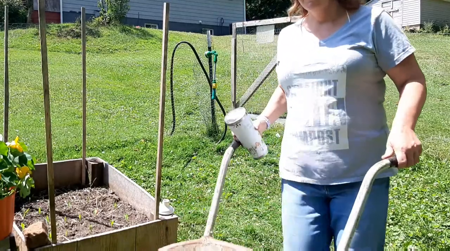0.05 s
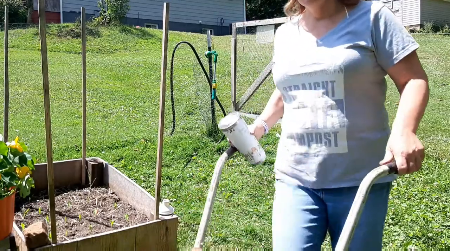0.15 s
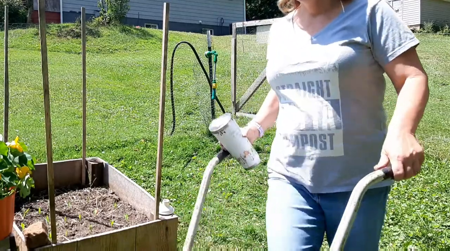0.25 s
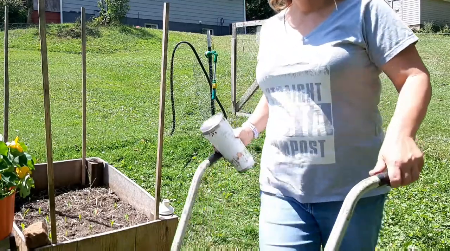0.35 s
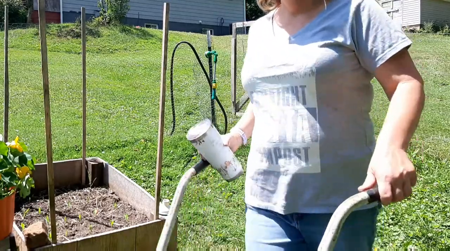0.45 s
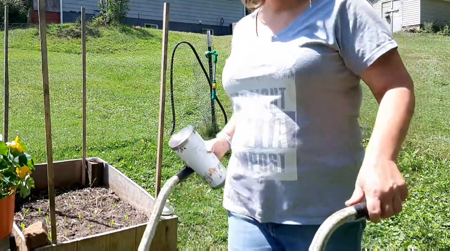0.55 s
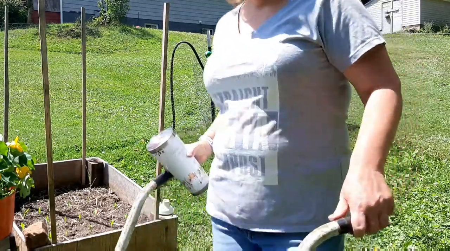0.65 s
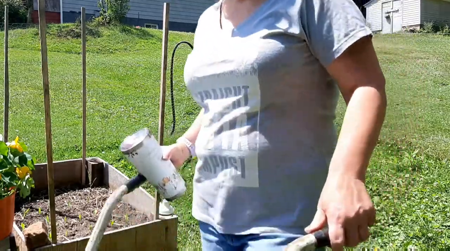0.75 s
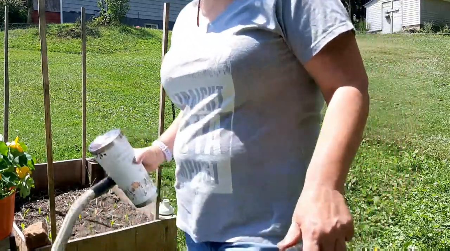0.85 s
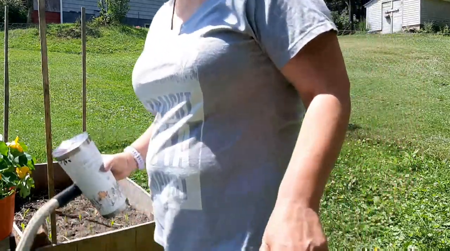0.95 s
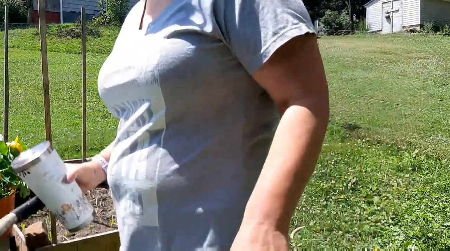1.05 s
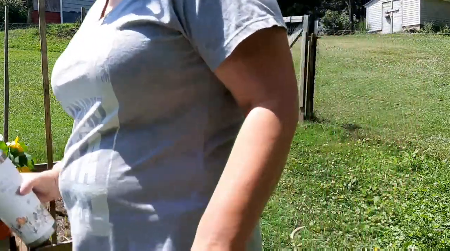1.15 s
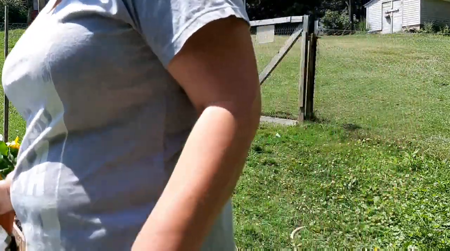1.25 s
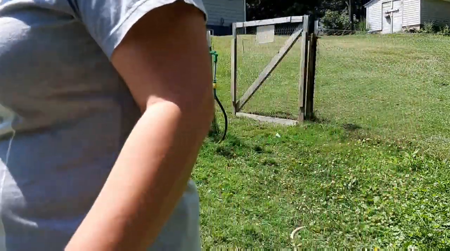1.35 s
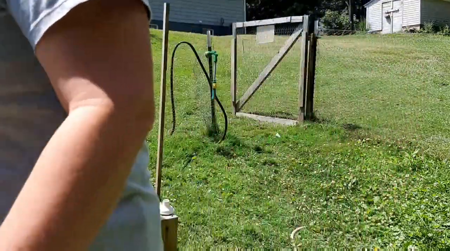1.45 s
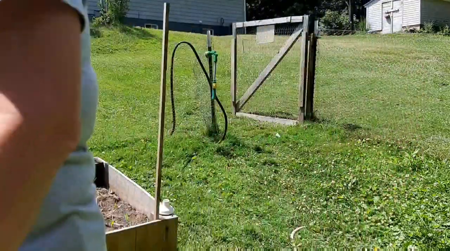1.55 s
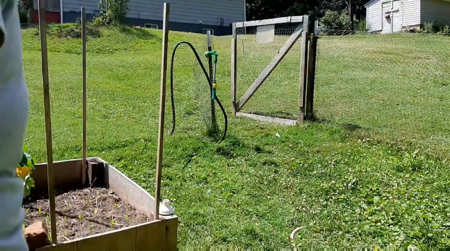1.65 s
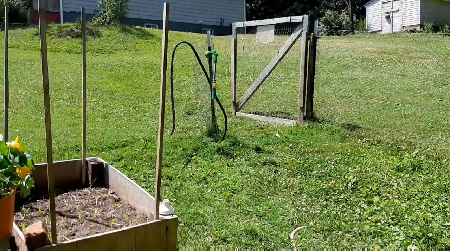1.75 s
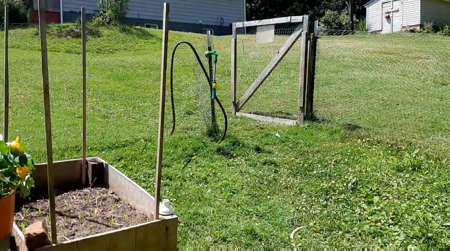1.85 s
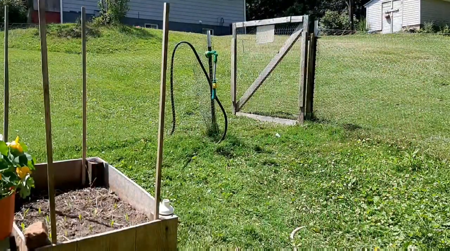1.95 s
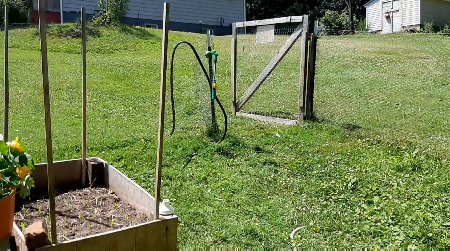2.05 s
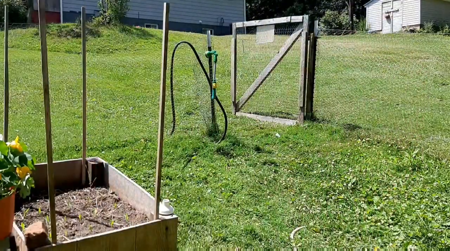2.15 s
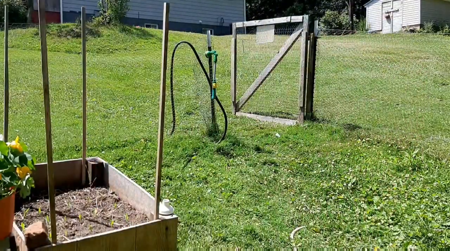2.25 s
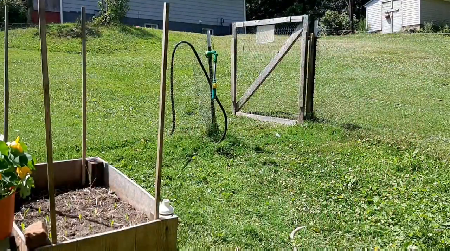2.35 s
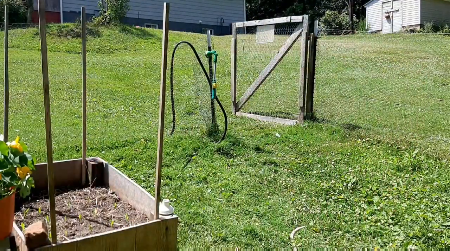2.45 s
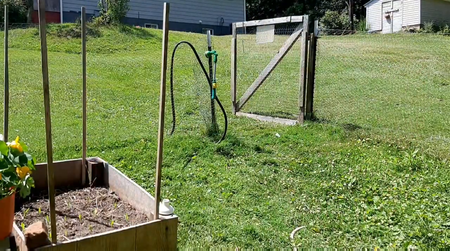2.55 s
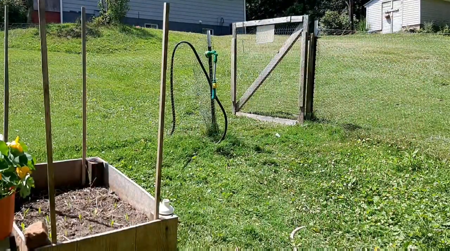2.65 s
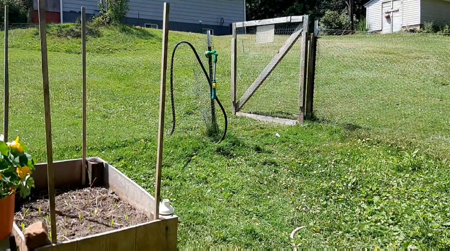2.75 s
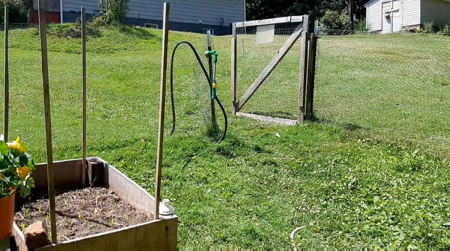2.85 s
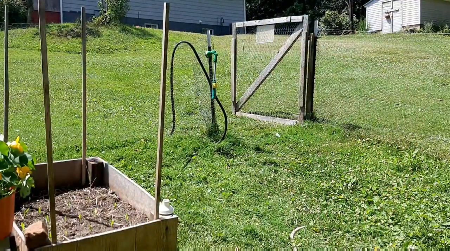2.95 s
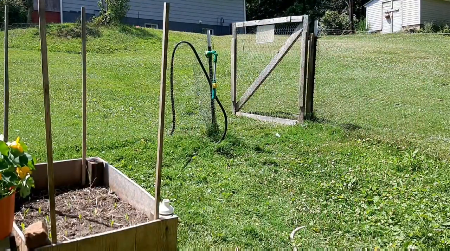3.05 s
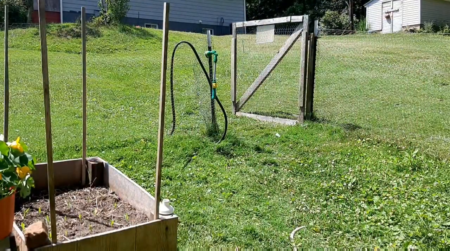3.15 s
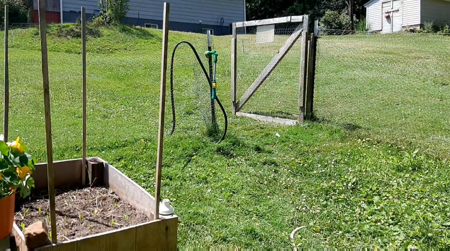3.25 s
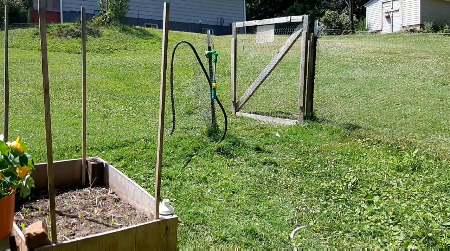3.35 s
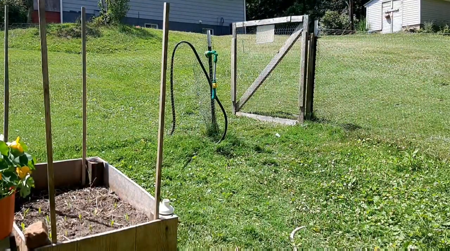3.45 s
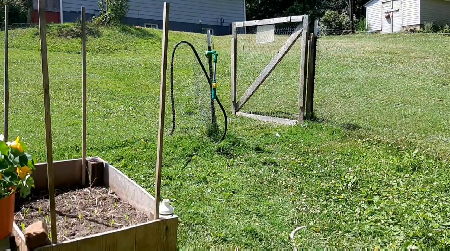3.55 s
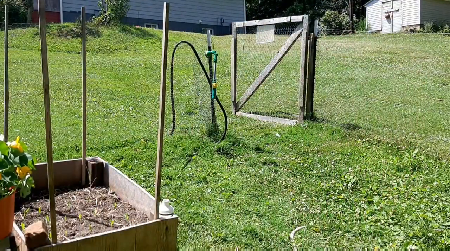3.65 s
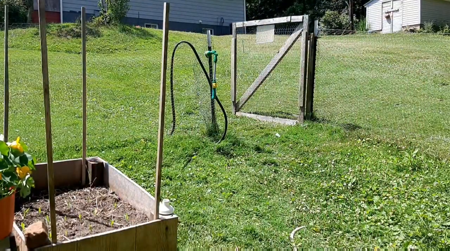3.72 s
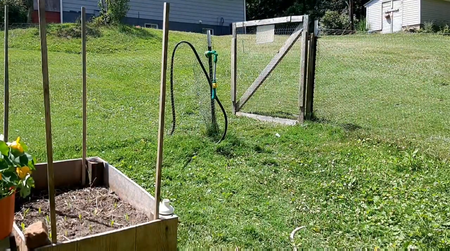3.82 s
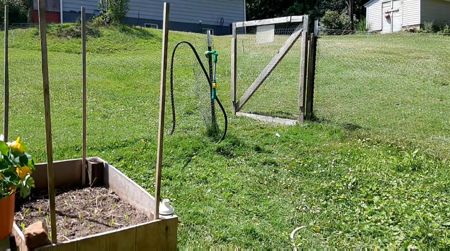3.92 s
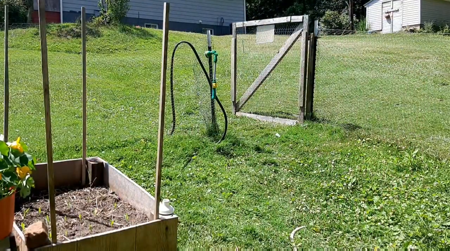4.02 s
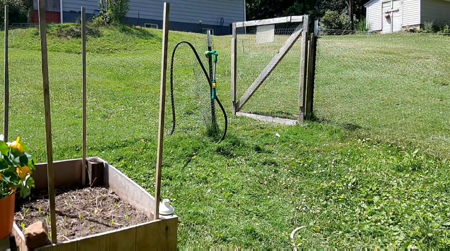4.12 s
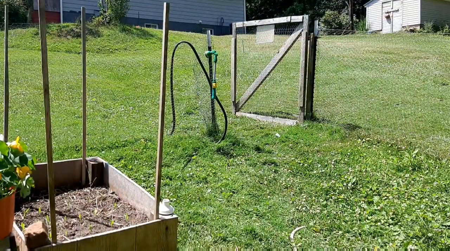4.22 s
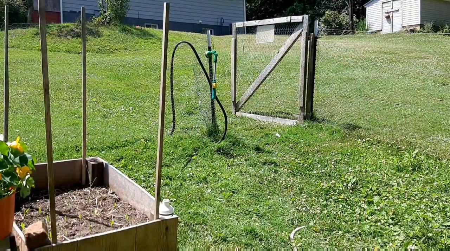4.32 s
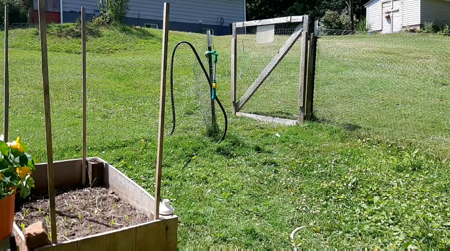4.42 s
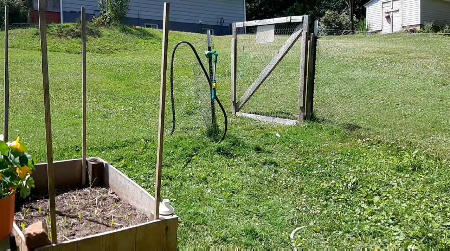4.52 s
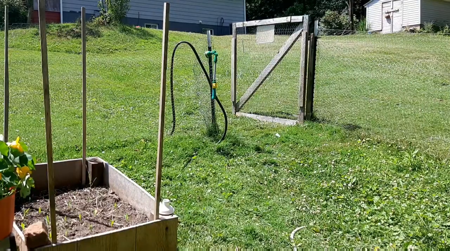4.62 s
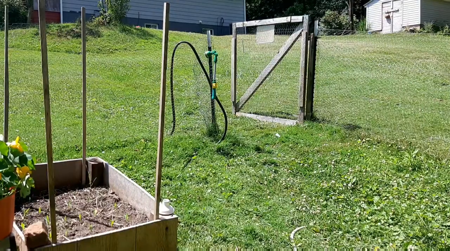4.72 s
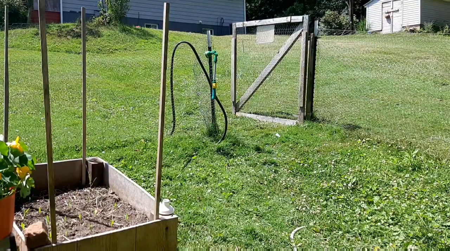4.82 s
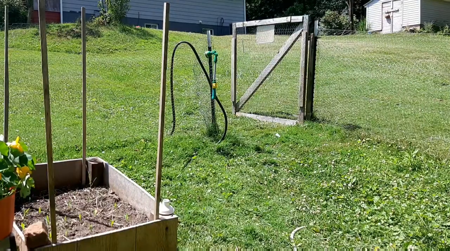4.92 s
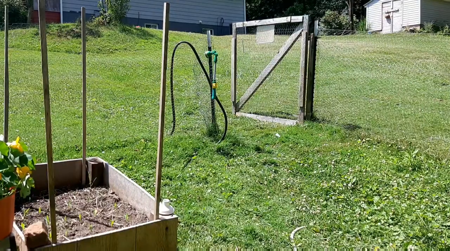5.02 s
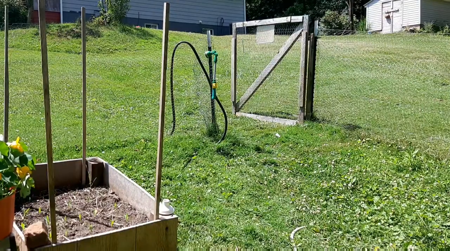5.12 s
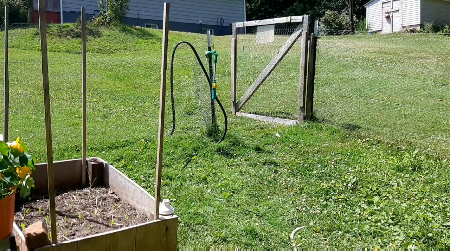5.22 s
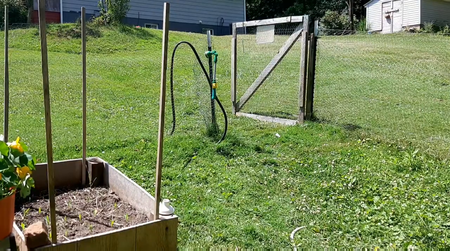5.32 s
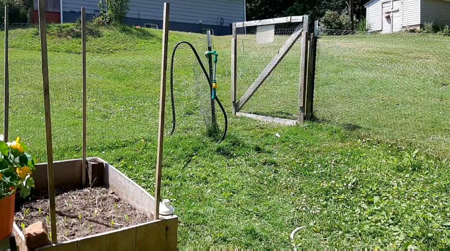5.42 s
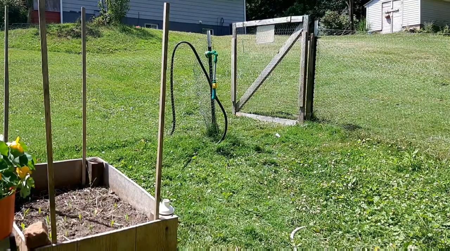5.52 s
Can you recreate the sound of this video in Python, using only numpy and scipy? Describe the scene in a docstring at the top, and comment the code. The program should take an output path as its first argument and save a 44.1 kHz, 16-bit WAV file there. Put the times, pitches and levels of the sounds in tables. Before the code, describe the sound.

A metal pail rattles in a bumping wheelbarrow that rolls by and away, followed by soft bird whistles.

```python
"""A steel wheelbarrow is pushed over a lawn, close past the microphone and away.
Every bump booms in its tray and makes a metal pail chatter and clank inside it: both ring as
sheet-steel modes over a wash of noise. Turf drums the frame; grass swishes under wheel and feet.
Songbirds whistle across the garden over a distant hum and stirring leaves,
and one puff of wind touches the microphone."""
import sys
import numpy as np
from scipy import signal
from scipy.fft import rfft, irfft, next_fast_len
from scipy.io import wavfile
from scipy.ndimage import uniform_filter1d, map_coordinates

SR = 44100
rng = np.random.default_rng(int(sys.argv[2]) if len(sys.argv) > 2 else 0)


def transcribe(signal):
    """Save signal, clipped to [-1, 1], as a 16-bit WAV file at the path in sys.argv[1]."""
    frames = np.atleast_2d(signal).T
    limited = np.clip(frames, -1, 1)
    pcm = np.round(limited * 32767).astype(np.int16)
    wavfile.write(sys.argv[1], SR, pcm)


N = 246078

# bumps that shake the tray: start_s, level_db, rattle_db (tilts the upper modes), favoured_hz
TRAY_BUMPS = [(0.048, -44, -14, 193), (0.216, -27.5, -10, 153), (0.238, -35, -0.5, 902),
              (0.309, -40, -12, 290), (0.636, -34.5, -17, 244), (0.682, -32.5, -7.5, 305),
              (0.698, -30, -4.5, 162.4), (0.849, -30.5, -6.5, 206), (1.226, -28, -11.5, 285),
              (1.251, -29, -19, 165), (1.472, -40.5, -2.5, 676), (1.539, -39, -22, 338),
              (1.784, -38, -14, 314), (1.87, -44.5, -18, 333), (2.289, -54, -19, 135)]
# ring of the tray: pitch_hz, relative_db, t60_s
TRAY_MODES = [(78, -19, 0.54), (130, 1.5, 0.37), (164.5, 2, 0.53), (198.2, -11.5, 2.1), (231, -10, 0.71),
              (290.8, -5, 1.58), (305.5, 1, 0.57), (343, -7, 1.4), (450.3, -3.5, 0.65), (563, -3, 0.66),
              (596, -5.5, 0.88), (678, -1, 0.21), (909, -3, 0.5), (892, -14, 1.1), (1011, -6, 0.42)]
# the tray's crowd of weak modes: freq_hz, density_db
TRAY_WASH = [(25, -60), (60, -29), (100, -20), (150, -1), (260, -2.5), (320, 2.5), (400, -11.5), (600, -7),
             (950, -7), (1150, -20.5), (2500, -17), (6000, -73)]
# first swing of a tray panel: pitch_hz, gain_db (on the bump's level)
PANEL_SWING = [(155, -5.5), (210, -0.5), (300, 1.5), (700, 0)]
# the tray flexes and hums: centre_s, half_width_s, pitch_hz, level_db
TRAY_FLEXES = [(0.438, 0.022, 214.7, -35.5)]
# pail hits on the tray; wall, rim and sizzle shape the lows, mids and top:
# start_s, level_db, wall_db, rim_db, sizzle_db, ring_factor, favoured_hz
PAIL_CLANKS = [(0.1958, -30.5, -9.5, -17, -11, 1.1, 6170), (0.218, -25.5, -12, -17.5, -13.5, 0.99, 4716),
               (0.239, -22.5, -12.5, -20, -13.5, 0.75, 5120), (0.251, -31.5, -8.5, -15, -14, 0.96, 6500),
               (0.652, -43, -4, -3, -23, 0.68, 4240), (0.692, -29.5, -11.5, -9.5, -10.5, 0.95, 3220),
               (0.713, -35, -16, -5.5, -16, 1.08, 3520), (0.8491, -31.5, -7, 4.5, -14, 0.76, 2285),
               (1.244, -34.5, -10.5, -6.5, -16, 1.36, 1670), (1.324, -46.5, -12, -6, -13, 0.9, 2340),
               (1.4695, -30, -14.5, -9, -8, 0.89, 6980), (1.480, -28, -23, -18, -12.5, 0.85, 4480)]
# ring of the pail: pitch_hz, relative_db, base_t60_s
PAIL_MODES = [(1284, -6, 0.66), (1520, -4.5, 0.56), (1536, -2, 0.46), (1690, 0.5, 0.37), (1850, -15, 0.31),
              (2026, 0.5, 0.38), (2270, -7, 0.13), (2330, -3.5, 0.28), (2440, -11, 0.4), (2750, -12, 0.14),
              (3245, -2, 0.3), (3450, 1.5, 0.21), (3590, -3, 0.29), (4200, -7, .35), (4480, -17, 0.18),
              (4480, 1, 0.088), (4716, -15, 0.083), (5180, 3, 0.07), (5360, 3, 0.088), (5660, -6, 0.22),
              (6070, -5, 0.17), (6170, -6, 0.23), (6530, 2, 0.16), (6560, -12, 0.18), (6780, -19, 0.25),
              (7100, -4.5, 0.26), (7540, -21, .22), (7950, -2.5, 0.24), (11040, -2, 0.11), (12180, 3, 0.12)]
# the pail's crowd of weak modes: freq_hz, density_db
PAIL_WASH = [(400, -43), (900, -9.5), (1400, -0.5), (2000, -2.5), (3200, -0.5), (3900, -5), (5000, 1.5),
             (6500, -5), (8000, -3.5), (12000, -6), (16000, -11)]
# decay of the wash in sheet steel: freq_hz, base_t60_s
STEEL_DECAY = [(100, 1), (300, 0.56), (900, 0.63), (2000, 0.49), (5000, 0.23), (8000, 0.21), (14000, 0.13)]
# resonances that the wheel drives: centre_hz, width_hz, relative_db
FRAME_RESONANCES = [(80.5, 9.3, 4.5), (143, 25.7, -2), (202.5, 58.4, -2.5), (283.5, 41, -3), (328.2, 25, 2),
                    (475, 124, -10), (584, 125, -13.5), (897, 130, -22), (1700, 1120, -30)]
# tone of brushed grass: freq_hz, density_db
GRASS_SPECTRUM = [(300, -49), (1500, 7.5), (4000, -2), (7000, 0), (11000, 0), (16000, 1.5)]
# a shoe sweeps through the grass: peak_s, level_db
FOOTSTEPS = [(1.005, -55), (1.425, -54.5), (1.94, -64), (2.4, -61), (2.99, -62), (3.44, -64), (3.98, -63),
             (4.53, -72), (5.08, -64.5), (5.485, -57)]
# longer spells of rustling: start_s, hold_s, level_db
GRASS_RUSTLES = [(1.03, 0.076, -67), (1.553, 0.39, -64), (2.007, 1, -66), (4.25, 0.48, -72),
                 (5.342, 0.11, -64.5)]
# short scuffs: peak_s, centre_hz, level_db
GRASS_SCUFFS = [(0.471, 4260, -57), (0.532, 5050, -52.5), (2.035, 2030, -58), (4.637, 3050, -58),
                (4.67, 3800, -62), (4.722, 2610, -62.5)]
# slurred whistles: start_s, length_s, start_hz, end_hz, level_db
BIRD_SLURS = [(0.038, 0.092, 2704, 2350, -63.5), (0.579, 0.077, 2560, 2430, -59.5),
              (1.211, 0.06, 2570, 2720, -57), (1.568, 0.07, 3050, 3036, -62),
              (2.848, 0.076, 3480, 2467, -54.5), (2.925, 0.045, 3217, 2340, -52),
              (2.953, 0.067, 2354, 2310, -52), (3.398, 0.037, 2430, 2680, -53.5),
              (3.432, 0.026, 2484, 2160, -51), (3.462, 0.0356, 2850, 2376, -57),
              (3.5, 0.077, 3104, 3160, -60.5), (3.58, 0.24, 2480, 2240, -62), (3.96, 0.06, 2930, 2546, -56),
              (4.027, 0.063, 3450, 2052, -53), (4.147, 0.056, 2555, 2590, -57.5),
              (4.25, 0.17, 2400, 2180, -62.5), (4.435, 0.056, 4970, 4880, -68),
              (4.81, 0.078, 2840, 2590, -63), (4.888, 0.087, 2520, 2300, -60)]
# buzzy notes: start_s, length_s, pitch_hz, level_db
BIRD_BUZZES = [(3.553, 0.029, 2820, -53), (4.218, 0.074, 2780, -59)]
# reverb of the trees: freq_hz, t60_s
GARDEN_DECAY = [(200, 0.65), (2500, 1), (10000, 0.66)]
# distant neighbourhood hum: freq_hz, density_db
HUM_SPECTRUM = [(15, -61.5), (25, -31), (46, -6), (64, 3.5), (92, -7.5), (108, -4.5), (156, -6), (188, -18),
                (286, -11), (814, -16), (909, -20.5), (1340, -20), (1860, -25), (2000, -23), (2600, -37),
                (4400, -120)]
# stirring leaves: freq_hz, density_db
LEAF_SPECTRUM = [(1200, -28), (2000, 0), (2800, -4), (4000, -4.5), (8000, -12.5), (12000, -40)]
# wind rumble on the microphone: freq_hz, density_db
WIND_SPECTRUM = [(20, -42), (40, -2.5), (70, 2), (100, -3.5), (150, -22), (300, -33), (1000, -60)]
# hollow in the microphone's treble: freq_hz, gain_db
MIC_RESPONSE = [(7700, 0), (8500, -11.5), (9900, -8), (10900, -0.5)]
# the hum swells twice: peak_s, boost_db
HUM_SWELLS = [(3.48, 4.7), (5.52, 2.7)]
# eddies within the puff of wind: peak_s, level_db
WIND_EDDIES = [(3.08, -46), (3.2, -39.5), (3.315, -41), (3.41, -43.5)]

PASS_S, SPEED_M_PER_S, CLOSEST_M = 0.4, 1.0, 1.1  # the barrow's straight path past the microphone
HIDDEN_S, SHADE_DB_PER_S, SHADE_MAX_DB = 1.7, 10.5, 10  # extra loss as it moves out of sight
ROLL_DB, JOLT_DB = -47, -13.5  # drumming at the closest point; extra drumming relative to each bump
TYRE_DB, TUFTS_DB, TUFTS_PER_S, LAWN_HISS_DB = -79, 6, 14.7, -74
HUM_DB, LEAVES_DB = -57.5, -69.5
WARBLE_HZ, SLUR_BEND = 75.2, 1.36  # more bend puts more of a bird's slide at the start of the note
MIC_TOP_HZ = 15850


def tray():
    """Each bump swings one panel wide and sets the tray booming; sharper ones reach its higher modes."""
    out, t = np.zeros(N), np.arange(SR) / SR
    comb = resonance_comb(depth_db=3, spacing_hz=22.18)
    for start_s, level_db, rattle_db, favoured_hz in TRAY_BUMPS:
        thump = (1 - np.exp(-t / 0.0013)) * np.exp(-t / 0.015)
        swing = amp(along(PANEL_SWING, favoured_hz)) * np.sin(2 * np.pi * favoured_hz * t) * thump
        colour = [(400, 0), (900, rattle_db + 4.5)]
        boom = steel_hit(TRAY_MODES, TRAY_WASH, comb, colour, favoured_hz, rise_s=0.00064,
                         ring_factor=1.0, favour_db=5.0, modes_db=-8.0, wash_db=-7.5)
        add(out, start_s, amp(level_db) * (swing + boom))
    t = np.arange(N) / SR
    for centre_s, half_width_s, pitch_hz, level_db in TRAY_FLEXES:
        flex = amp(level_db) * np.exp(-((t - centre_s) / half_width_s) ** 2)
        out += flex * np.sqrt(2) * np.sin(2 * np.pi * pitch_hz * t)
    return out


def pail():
    """The pail clanks; while it still touches the tray it chatters in quick uneven contacts."""
    out, t = np.zeros(N), np.arange(SR) / SR
    comb = resonance_comb(depth_db=7, spacing_hz=35)
    for start_s, level_db, wall_db, rim_db, sizzle_db, ring_factor, favoured_hz in PAIL_CLANKS:
        # a glancing blow builds up slowly, a square one on the rim at once
        rise_s = 0.0026 / (1 + 2.8 * amp(rim_db) ** 2)
        colour = [(1800, wall_db + 5), (2200, rim_db + 4.0), (3100, rim_db + 5.5),
                  (3900, 0), (8000, 0), (11000, sizzle_db + 9)]
        chatter_db = 1.7 * wobble(418, size=SR) * np.exp(-t / 0.033)
        first_touch_db = 3.1 * np.exp(-t / 0.0031)
        clank = steel_hit(PAIL_MODES, PAIL_WASH, comb, colour, favoured_hz, rise_s, ring_factor,
                          favour_db=12.5, modes_db=-5.5, wash_db=-3.0)
        add(out, start_s, amp(level_db + chatter_db + first_touch_db) * clank)
    return out


def steel_hit(modes, wash, comb, colour, favoured_hz, rise_s, ring_factor, favour_db, modes_db, wash_db):
    """One blow on sheet steel: clear modes over a crowd of weak ones, coloured by where it lands."""
    t = np.arange(SR) / SR
    hz, db, t60_s = np.transpose(modes)
    # a blow near the belly of one mode makes that mode sing out
    nearness = np.exp(-((hz - favoured_hz) / (.03 * hz)) ** 2)
    struck_db = db + favour_db * nearness + along(colour, hz)
    strength = amp(struck_db + rng.standard_normal(len(hz))) / np.linalg.norm(amp(db))
    phase = rng.uniform(0, 2 * np.pi, (len(hz), 1))
    decay = amp(-60 * t / (ring_factor * t60_s[:, None]))
    ring = strength @ (np.sin(2 * np.pi * hz[:, None] * t + phase) * decay)
    crowd = unit(filtered(rng.standard_normal(SR), lambda f: comb(f) * amp(along(wash, f))))
    crowd = filtered(crowd, lambda f: amp(along(colour, f)))
    crowd = damped(crowd, np.array(STEEL_DECAY) * [1, ring_factor])
    attack = 1 - np.exp(-t / rise_s)  # bending waves need a moment to spread over the sheet
    return (amp(modes_db) * ring + amp(wash_db) * crowd) * attack


def resonance_comb(depth_db, spacing_hz):
    """A sheet's small uneven resonances, as a gain over frequency."""
    knots = rng.standard_normal(2048)
    ripple = lambda hz: map_coordinates(knots, [hz / spacing_hz], mode="mirror", order=1)
    return lambda hz: amp(depth_db * np.tanh(ripple(hz)))


def wheel():
    """Uneven turf keeps the frame drumming, harder after each bump, fading as the barrow leaves."""
    def frame(f):
        return sum((-1) ** k * amp(db) * 1j * f * width / (centre ** 2 - f ** 2 + 1j * f * width)
                   for k, (centre, width, db) in enumerate(FRAME_RESONANCES))
    turf = rng.standard_normal(N) * amp(1.7 * wobble(25))
    roll = amp(ROLL_DB) * pass_by()
    jolts = [amp(db + JOLT_DB) * envelope(s, rise_s=0.014, fall_s=0.14) for s, db, *_ in TRAY_BUMPS]
    return power_sum([roll, *jolts]) * unit(filtered(turf, frame))


def pass_by():
    """Gain of the barrow: 1 at its closest, falling with distance and once it is out of sight."""
    t = np.arange(N) / SR
    distance_m = np.hypot(CLOSEST_M, SPEED_M_PER_S * (t - PASS_S))
    shade_db = np.clip(SHADE_DB_PER_S * (t - HIDDEN_S), 0, SHADE_MAX_DB)
    return CLOSEST_M / distance_m * amp(-shade_db)


def grass():
    """Blades swish under the tyre and at every step, with spells of rustling and a few short scuffs."""
    tyre = amp(TYRE_DB + TUFTS_DB * wobble(TUFTS_PER_S)) * pass_by() ** 2
    steps = [amp(db) * envelope(s, rise_s=0.053, fall_s=0.042) for s, db in FOOTSTEPS]
    rustles = [amp(db) * envelope(s, rise_s=0.11, fall_s=0.073, hold_s=hold_s)
               for s, hold_s, db in GRASS_RUSTLES]
    blades = unit(noise(GRASS_SPECTRUM) * amp(1.3 * wobble(600)))  # fast flicker adds grain
    out = power_sum([amp(LAWN_HISS_DB), tyre, *steps, *rustles]) * blades
    for peak_s, hz, level_db in GRASS_SCUFFS:
        band = [(hz / 4, -18), (hz * 0.62, -8), (hz, 0), (hz * 1.32, -9), (hz * 3, -22)]
        out += amp(level_db) * swell(peak_s, sigma_s=0.013) * noise(band)
    return out


def birds():
    """Songbirds whistle slurs and buzzes; a second voice repeats one thin note, ever lower and softer."""
    song = np.zeros(N)
    for start_s, length_s, start_hz, end_hz, level_db in BIRD_SLURS:
        add(song, start_s, amp(level_db) * whistle(length_s, start_hz, end_hz, depth_hz=45))
    for start_s, length_s, pitch_hz, level_db in BIRD_BUZZES:
        add(song, start_s, amp(level_db) * whistle(length_s, pitch_hz, pitch_hz, depth_hz=283))
    for k in range(5):
        start_s, level_db = 1.775 + 0.12 * k, -63.5 - 1.6 * k
        pitch_hz = 4020 + 320 * 0.34 ** k
        add(song, start_s, amp(level_db) * whistle(0.095, pitch_hz, pitch_hz, depth_hz=85))
    return garden_reverb(song)


def whistle(length_s, start_hz, end_hz, depth_hz):
    """One bird note: a sine that slides, settles and warbles."""
    progress = np.linspace(0, 1, int(length_s * SR))
    glide_hz = start_hz + (end_hz - start_hz) * np.expm1(-SLUR_BEND * progress) / np.expm1(-SLUR_BEND)
    warble = np.sin(2 * np.pi * WARBLE_HZ * length_s * progress) + 0.426 * wobble(183, len(progress))
    arch = np.sqrt(np.abs(np.sin(np.pi * progress)))
    return arch * np.sin(2 * np.pi * np.cumsum(glide_hz + depth_hz * warble) / SR)


def garden_reverb(song):
    """Trees scatter the song into a tail and house walls throw back a blurred echo."""
    trees = damped(rng.standard_normal(SR), GARDEN_DECAY)
    walls = rng.standard_normal(SR) * swell(peak_s=0.14, sigma_s=0.035)[:SR]
    tail = amp(-3.5) * trees / np.linalg.norm(trees) + amp(-11.5) * walls / np.linalg.norm(walls)
    return amp(-1.0) * song + signal.fftconvolve(song, tail)[:N]


def wind_puff():
    """A few eddies hit the microphone and merge into one low puff."""
    rumble = noise(WIND_SPECTRUM)
    rumble /= np.sqrt(np.abs(uniform_filter1d(rumble ** 2, size=SR // 16)))  # even out the flutter
    eddies = [amp(db) * envelope(s, rise_s=0.031, fall_s=0.059) for s, db in WIND_EDDIES]
    return power_sum(eddies) * rumble


def ambience():
    """The bed: the distant hum of the neighbourhood and leaves stirring."""
    swells_db = sum(db * swell(s, sigma_s=0.13) for s, db in HUM_SWELLS)
    hum = amp(HUM_DB + swells_db + 0.34 * wobble(6.6)) * noise(HUM_SPECTRUM)
    leaves = amp(LEAVES_DB + 2.1 * wobble(2.6)) * noise(LEAF_SPECTRUM)
    return hum + leaves


def amp(db):
    """Decibels to gain."""
    return 10 ** (np.asarray(db) / 20)


def unit(x):
    """x scaled to rms 1."""
    return x / np.sqrt(np.mean(x ** 2) + 1e-20)


def power_sum(envelopes):
    """Joint envelope of unrelated noises: their powers add."""
    return np.sqrt(sum(part ** 2 for part in envelopes))


def along(points, hz):
    """Read a curve of (freq_hz, value) points on a log frequency axis."""
    freqs, values = np.transpose(points)
    return np.interp(np.log(hz + 1), np.log(freqs + 1), values)


def wobble(knots_per_s, size=N):
    """A smooth random curve."""
    knots = rng.standard_normal(int(N * knots_per_s / SR) + 4)
    return map_coordinates(knots, [np.arange(size) * knots_per_s / SR])


def filtered(x, response):
    """EQ x with a gain that is a function of frequency."""
    size = next_fast_len(len(x) + 8192)
    return irfft(rfft(x, size) * response(np.fft.rfftfreq(size, 1 / SR)), size)[:len(x)]


def noise(spectrum):
    """Coloured noise of rms 1."""
    return unit(filtered(rng.standard_normal(N), lambda hz: amp(along(spectrum, hz))))


def damped(x, decay):
    """Fade each frequency of x at its own speed, set by (freq_hz, t60_s) points."""
    hz, t, bands = signal.stft(x, SR, nperseg=256)
    fade = amp(-60 * t / along(decay, hz)[:, None])
    return signal.istft(bands * fade, SR, nperseg=256)[1][:len(x)]


def envelope(peak_s, rise_s, fall_s, hold_s=0):
    """Grows to 1 at peak_s, holds, and dies away."""
    t = np.arange(N) / SR - peak_s
    return np.exp(np.minimum(t, 0) / rise_s - np.maximum(t - hold_s, 0) / fall_s)


def swell(peak_s, sigma_s):
    """A smooth bell around peak_s."""
    return np.exp(-((np.arange(N) / SR - peak_s) / sigma_s) ** 2 / 2)


def add(track, start_s, sound):
    """Mix a sound in from start_s."""
    start = round(start_s * SR)
    track[start:start + len(sound)] += sound[:N - start]


def scene():
    """The barrow and the garden around it, mixed in mono."""
    return (tray() + pail() + wheel() + grass() + birds() + ambience() + wind_puff())[None]


def record(dry):
    """The microphone has a hollow in its treble and a band limit."""
    return filtered(dry[0], lambda hz: amp(along(MIC_RESPONSE, hz)) * (hz < MIC_TOP_HZ))[None]


dry = scene()
out = record(dry)
transcribe(out)
```